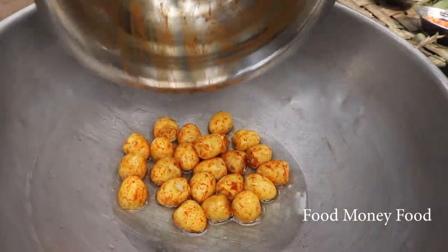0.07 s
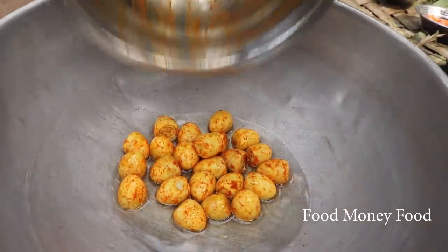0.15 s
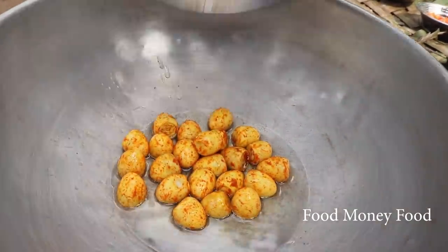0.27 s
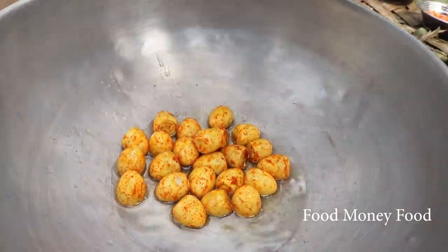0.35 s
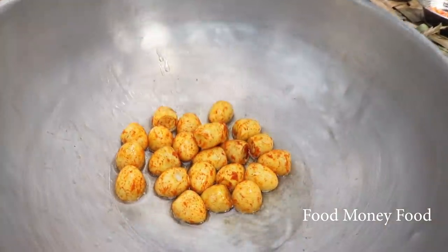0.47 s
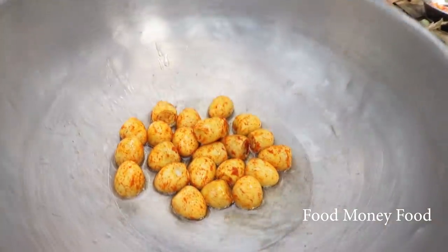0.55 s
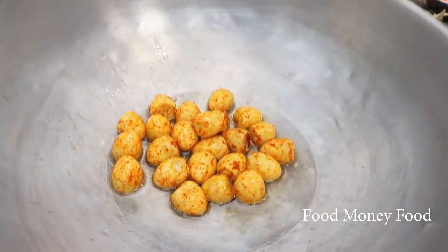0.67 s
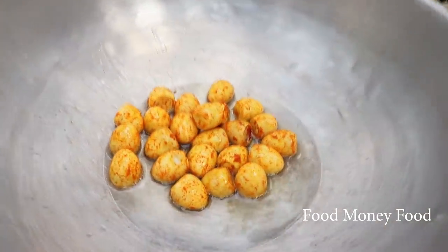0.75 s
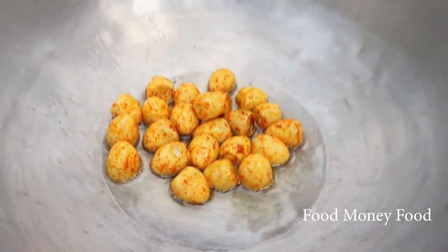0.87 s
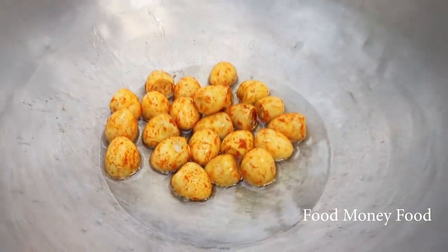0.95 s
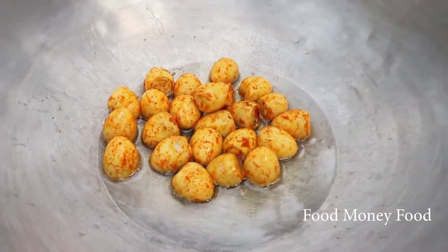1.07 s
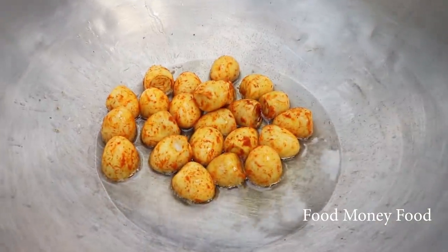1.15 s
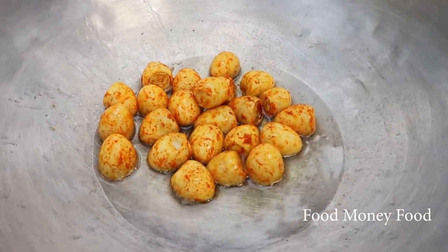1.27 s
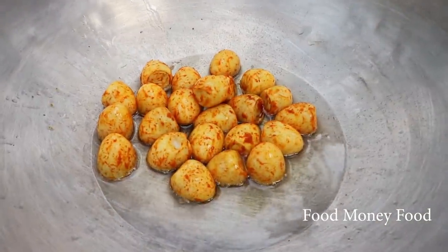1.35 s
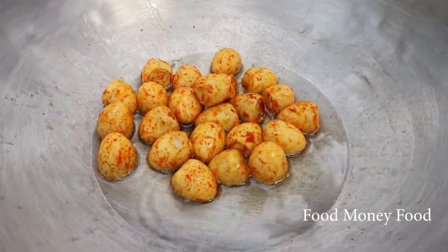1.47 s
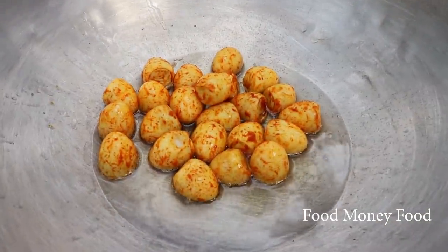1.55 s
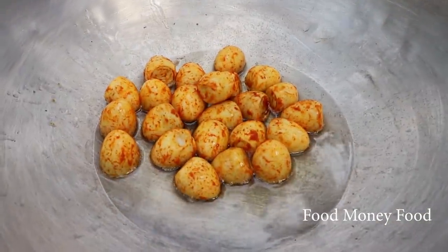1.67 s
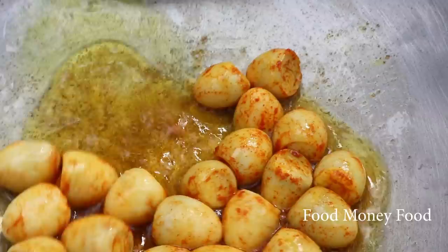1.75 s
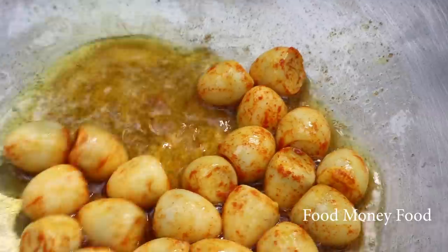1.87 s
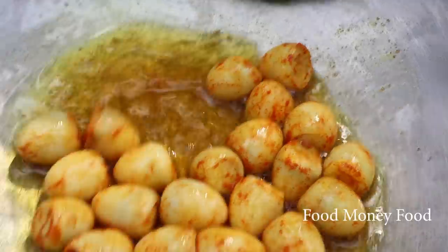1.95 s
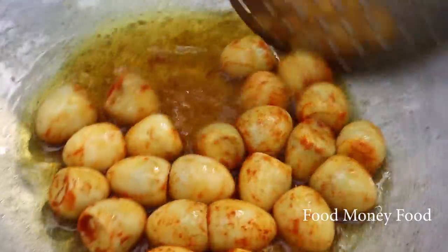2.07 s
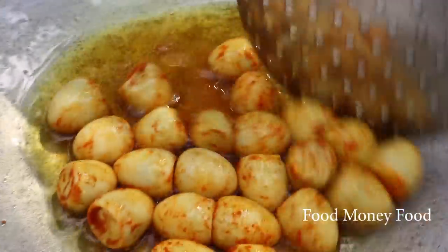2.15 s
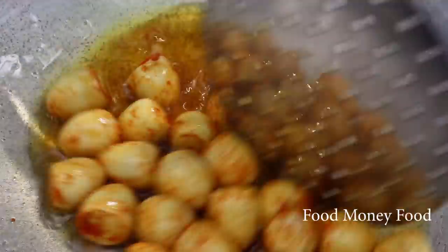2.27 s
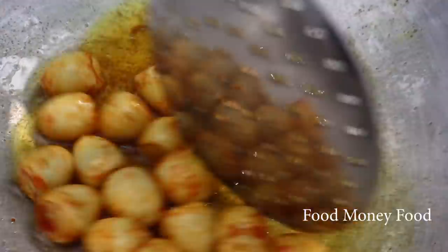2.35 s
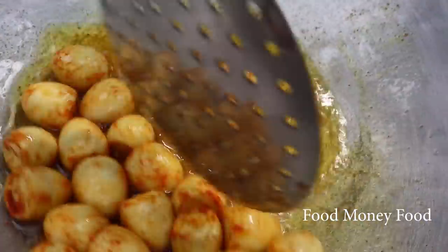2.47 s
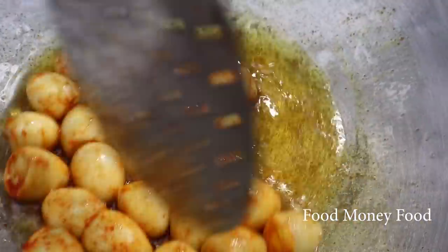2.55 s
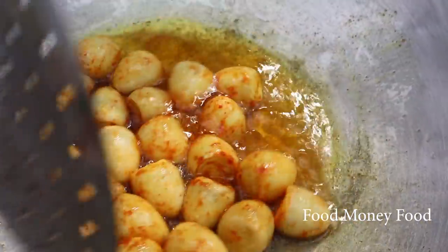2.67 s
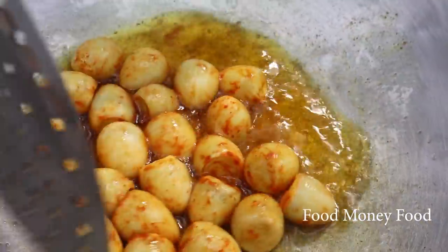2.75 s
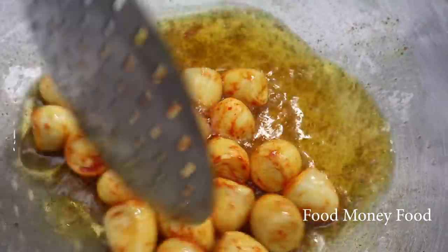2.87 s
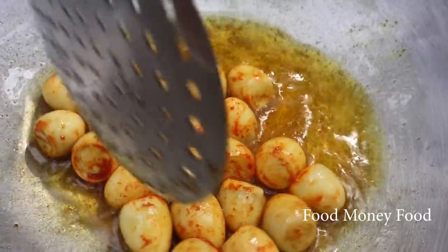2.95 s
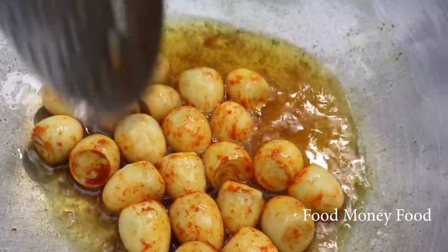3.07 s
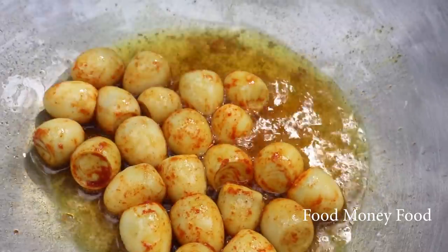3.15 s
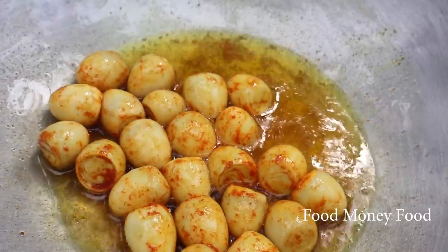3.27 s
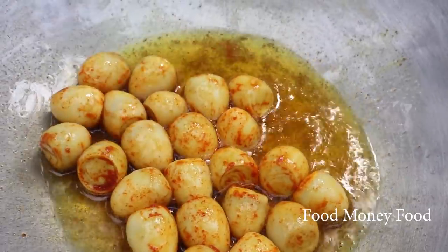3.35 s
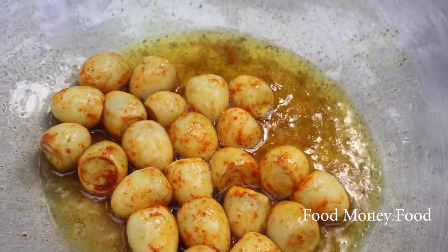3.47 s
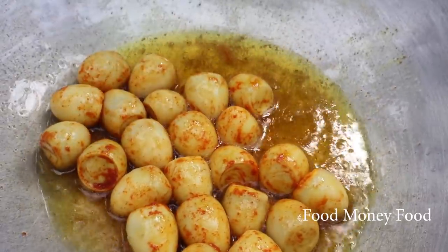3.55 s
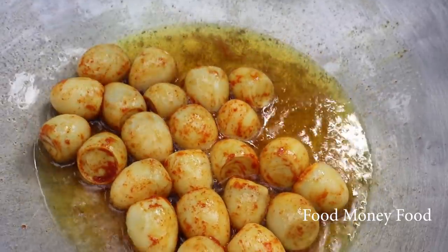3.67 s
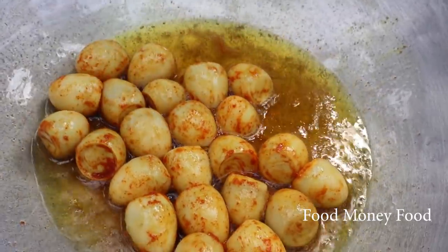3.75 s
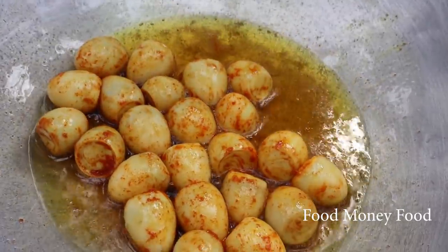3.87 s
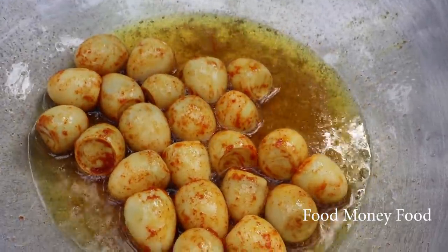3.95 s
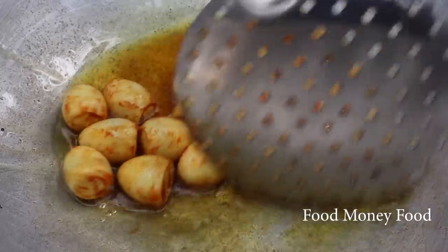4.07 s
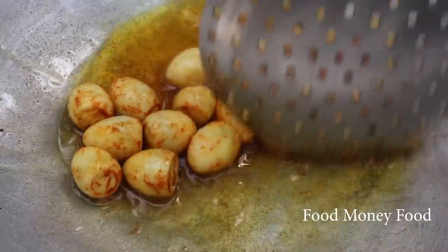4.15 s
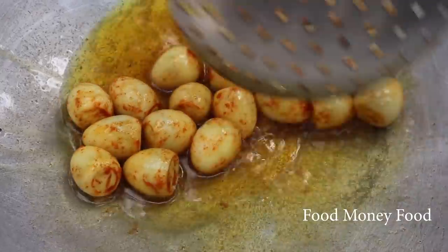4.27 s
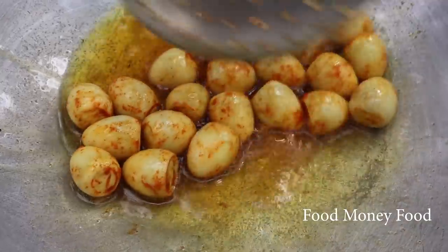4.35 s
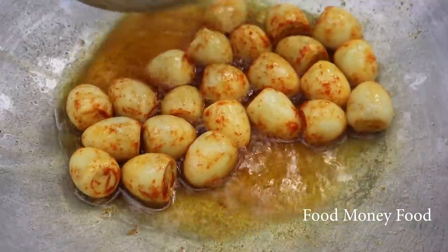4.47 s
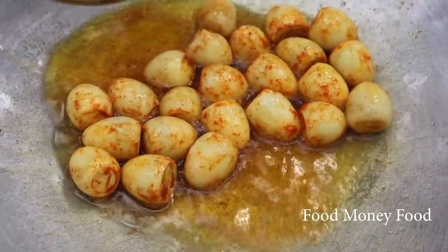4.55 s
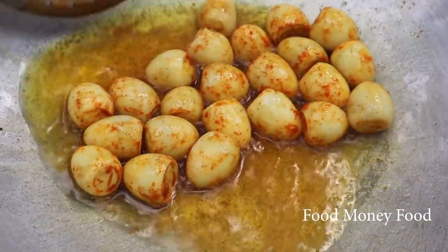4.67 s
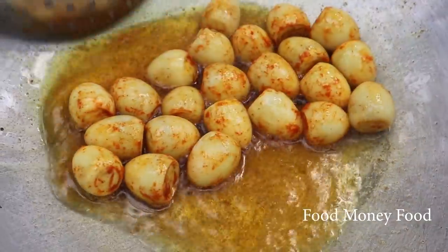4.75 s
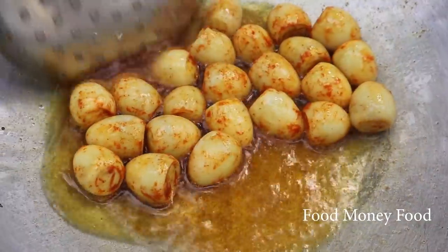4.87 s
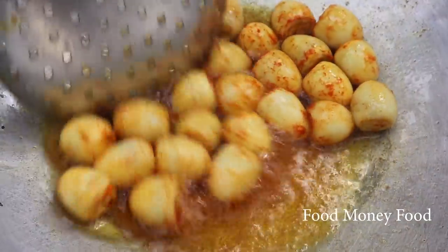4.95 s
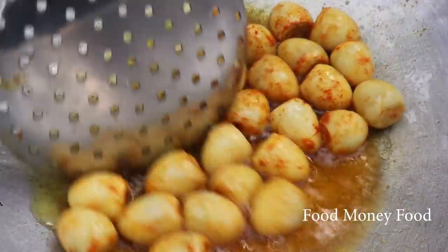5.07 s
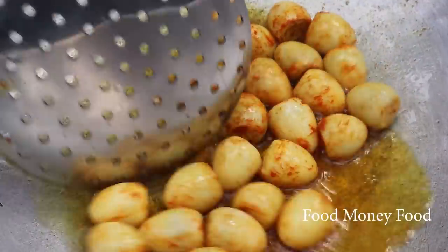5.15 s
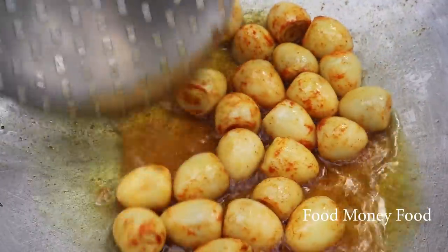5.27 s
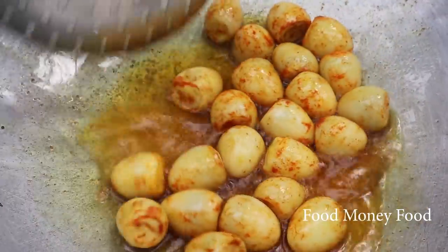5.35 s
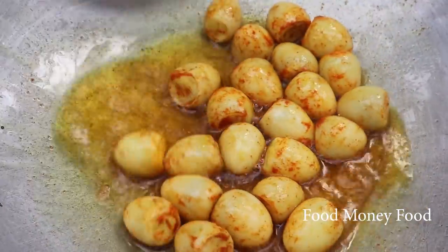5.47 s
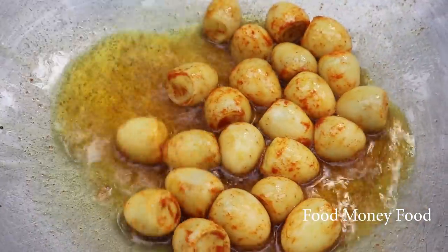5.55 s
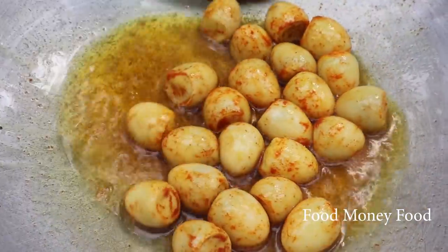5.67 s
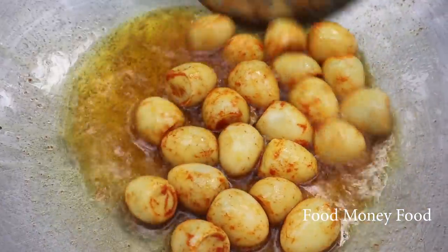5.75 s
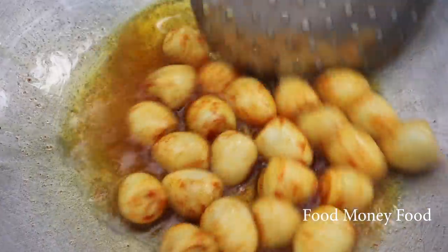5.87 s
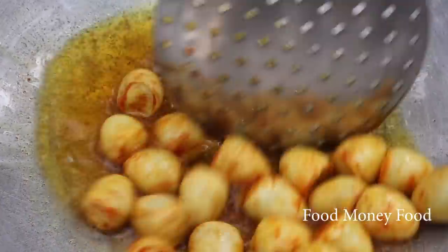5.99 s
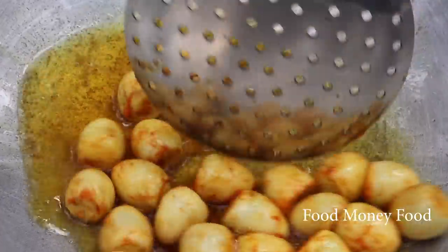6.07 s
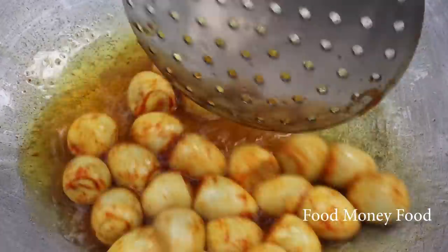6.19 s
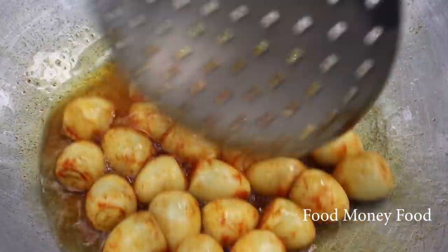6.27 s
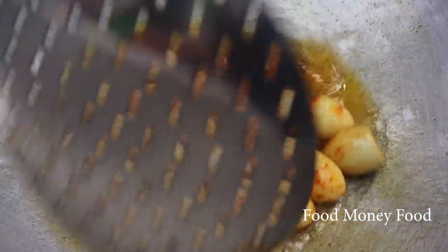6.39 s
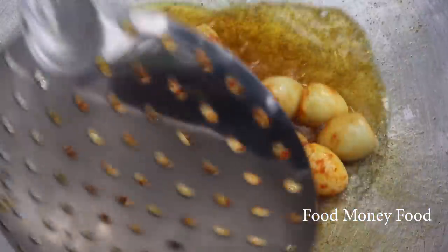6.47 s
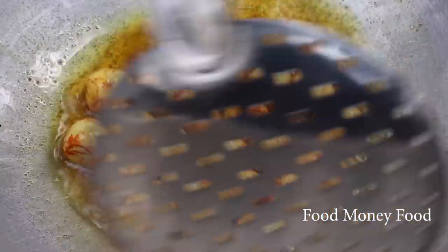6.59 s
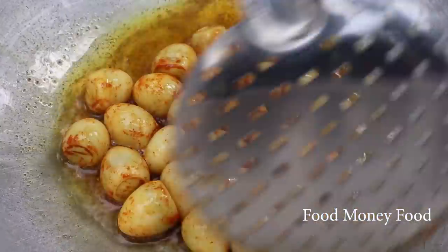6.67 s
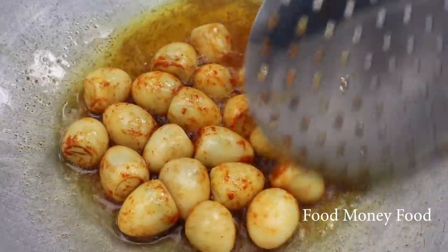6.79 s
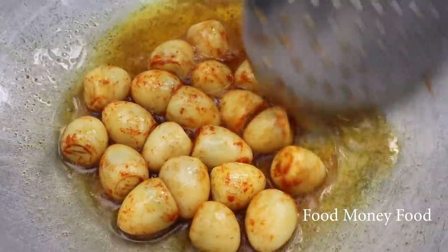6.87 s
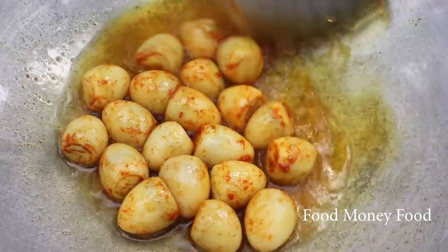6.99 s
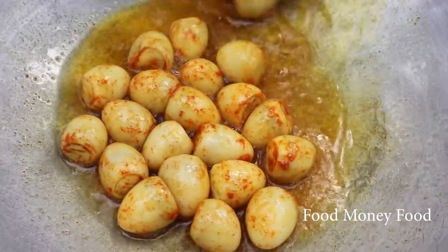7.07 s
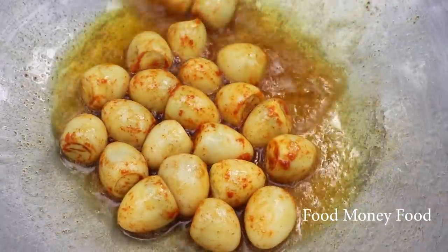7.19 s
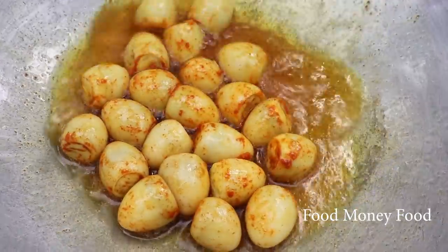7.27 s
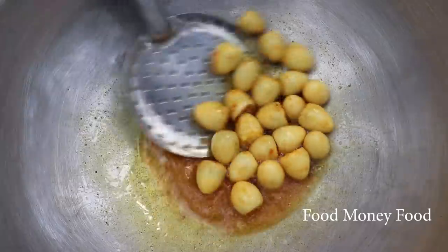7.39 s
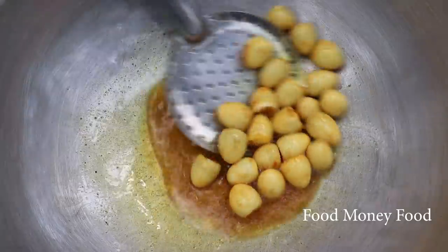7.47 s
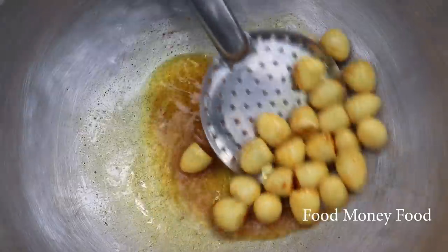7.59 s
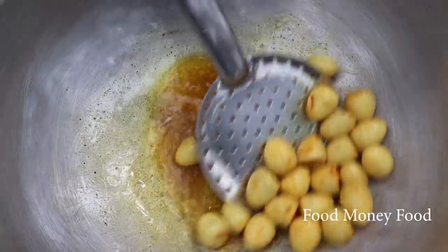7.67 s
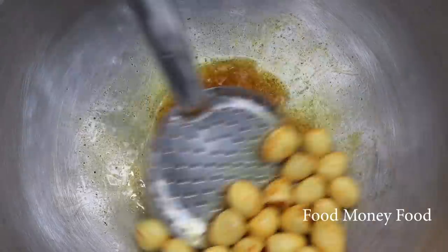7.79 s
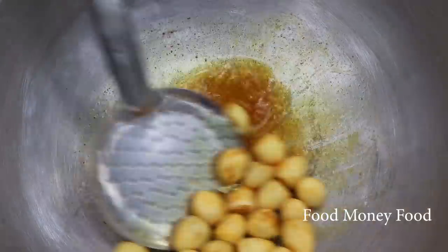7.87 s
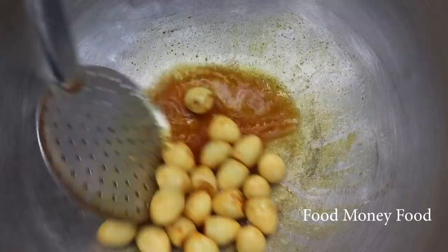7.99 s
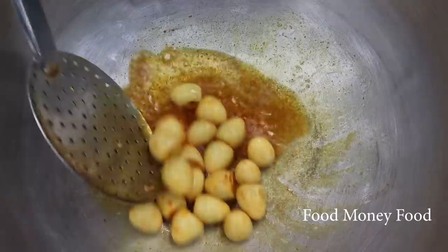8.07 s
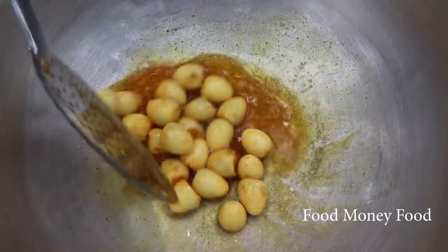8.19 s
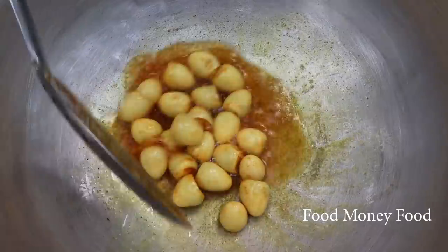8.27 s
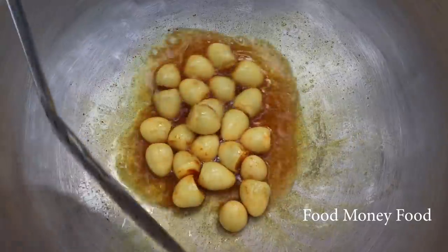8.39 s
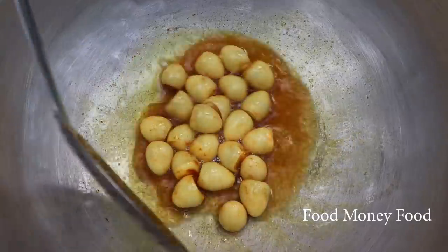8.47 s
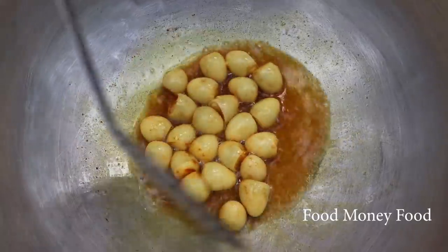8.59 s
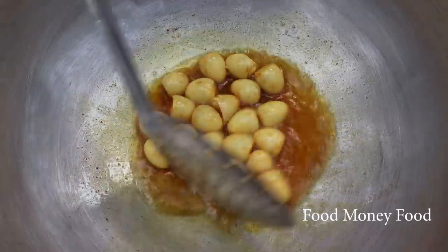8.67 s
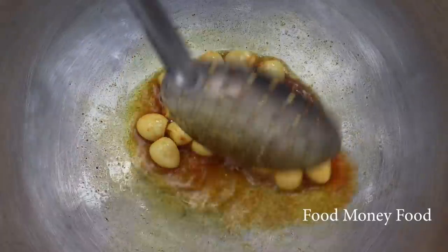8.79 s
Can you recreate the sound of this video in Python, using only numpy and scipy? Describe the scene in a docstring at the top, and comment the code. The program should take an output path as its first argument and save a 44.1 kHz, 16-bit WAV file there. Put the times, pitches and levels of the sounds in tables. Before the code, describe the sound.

A metal bowl hums briefly as it is drawn away from a wide pan where eggs fry with a dense, crackling sizzle. The frying then abruptly turns fuller and oilier, with a soft low thump, sharp bubble pops and loud clanks of a slotted ladle that ring and scrape along the pan. Outdoors, very close microphone, light low wind; the hardest knocks overload and briefly push the sizzle down.

```python
"""Small eggs fry in oil in a wide metal pan outdoors, close to a microphone in a light wind. At first the
frying, dense clicks and hiss, has one colour, while a bowl hums as filtered noise, low turbulence blows and
bubbles burst as short rings and puffs. From 1.76 s the frying turns within 20 ms to a deeper colour; a soft
thump, a dying sine, follows. Then a slotted ladle knocks the pan, ringing its modes, and scrapes along it as
slips drive resonances; knocks overload the input and gain control ducks the sizzle."""
import sys
import numpy as np
from scipy import signal
from scipy.io import wavfile
from scipy.ndimage import uniform_filter1d

SR = 44100
rng = np.random.default_rng(int(sys.argv[2]) if len(sys.argv) > 2 else 0)


def to_linear_factor(level_db):
    """Convert decibel levels (scalar or array-like) to linear amplitude factors."""
    exponent = np.asarray(level_db, float) / 20
    return 10 ** exponent


def master_out(mix):
    """Clip the mix to full scale and print it as 16-bit PCM to the path in sys.argv[1]."""
    frames = np.transpose(np.atleast_2d(mix))
    ceiling = np.clip(frames, -1, 1)
    pcm = np.round(ceiling * 32767).astype(np.int16)
    wavfile.write(sys.argv[1], SR, pcm)


N = 389403  # samples

# Colour of the frying from 1.76 s on. Each row: frequency in Hz, relative spectral level in dB per Hz.
LATER_FRYING = [(120, -11.5), (200, -16), (366, 3.5), (394, -1), (424, 1), (509, -10.5), (867, -14),
                (1370, -8.5), (1590, -4), (1740, -6.5), (2960, -6.5), (4200, 1), (4950, -12), (9930, -15.5),
                (13500, -29), (16000, -32)]
# Modes of the pan. Each row: frequency in Hz, relative level in dB, decay time t60 in seconds.
PAN = [(415, -1, 0.5), (419.5, -3, 0.45), (352, -10, 0.13), (292, -20, 0.057), (480, -13, 0.1),
       (560, -14, 0.1), (847, -35, 0.07)]


def evened(x):
    """Normalisation of power: scales to rms 1."""
    return x / np.sqrt(np.mean(x ** 2) + 1e-20)


def read(points, hz):
    """Interpolation of a spectrum on a logarithmic frequency axis."""
    f, value = np.transpose(points)
    return np.interp(np.log(hz + 1), np.log(f + 1), value)


def add(mix, s, sound):
    """Superposition: adds a sound to the mix at time s in seconds."""
    part = mix[round(s * SR):][:len(sound)]
    part += sound[:len(part)]


def coloured(x, points):
    """Minimum-phase filtering: the Hilbert transform of the log gain gives a causal response."""
    level_db = np.maximum(read(points, np.abs(np.fft.fftfreq(4096, 1 / SR))), -90)
    log_gain = np.log(to_linear_factor(level_db))
    taps = np.fft.ifft(np.exp(np.conj(signal.hilbert(log_gain)))).real[:2048]
    return signal.oaconvolve(x, taps)[:len(x)]


def ringing(modes, seconds):
    """Modal decay: a struck body sounds as a sum of exponentially dying sines."""
    t = np.arange(round(seconds * SR)) / SR
    return sum(to_linear_factor(db - 60 * t / t60) * np.sin(2 * np.pi * hz * t) for hz, db, t60 in modes)


def clicks(per_s, spread_db):
    """Random impulse process: independent clicks of either sign, a few much larger than the rest."""
    size = to_linear_factor(spread_db * np.minimum(rng.exponential(1, N), 5))
    occurs = rng.random(N) < per_s / SR
    return size * occurs * rng.choice([-1., 1.], N)


def wobble(size, seconds):
    """Slow random fluctuation: twice-smoothed noise, evened to rms 1 over the whole scene, then cut."""
    span = max(round(seconds * SR), 2)
    slow = uniform_filter1d(uniform_filter1d(rng.standard_normal(N), span), span)
    return evened(slow)[:size]


def resonate(x, hz, width):
    """Heterodyne resonance that can follow a pitch curve: shift to zero, smooth twice, shift back."""
    turn = np.exp(2j * np.pi * np.cumsum(hz * np.ones(len(x))) / SR)
    r = np.exp(-np.pi * width / SR)
    smooth = signal.lfilter([(1 - r) ** 2], [1, -2 * r, r * r], x / turn)
    return 2 * (turn * smooth).real


def clatter(x, top_hz=7500):
    """Broadband excitation of a body: dull wide noise takes on the colour of the later frying."""
    dull = signal.butter(2, top_hz, fs=SR, output="sos")
    return evened(signal.sosfilt(dull, coloured(x, LATER_FRYING)))


def burst(hz, t60, noise, tonal=.6, echo_s=0.0016):
    """Bubble collapse: the wall tears in a short rising ring and a puff of spray; the pan wall echoes."""
    t = np.arange(len(noise)) / SR
    ring = np.sin(2 * np.pi * hz * t * (1 + 12 * t)) * to_linear_factor(-60 * t / (0.22 * t60))
    # the echo repeats the ring alone
    ring += 0.78 * np.roll(ring, round(echo_s * SR)) * (t > echo_s)
    puff = evened(resonate(noise, hz, 0.76 * hz)) * to_linear_factor(-60 * t / t60)
    return (tonal * ring + 0.29 * puff) * (1 - np.exp(-t / 0.00015))


def ticks(tilt_db_per_octave=-4.5):
    """Impulsive radiation: tiny droplets of oil snap as very short, bright damped sines."""
    t, out = np.arange(200) / SR, np.zeros(N)
    for hz in np.geomspace(5500, 14000, 8):
        snap = np.sin(2 * np.pi * hz * t) * np.exp(-t / 0.00022) * (1 - np.exp(-t / .0001))
        band = signal.oaconvolve(clicks(per_s=120, spread_db=5.0), snap)[:N]
        out += to_linear_factor(tilt_db_per_octave * np.log2(hz / 8000)) * band
    return evened(out)


def sizzle(hiss_db=-4, crackle_db=-3):
    """Source and filter: countless small bubbles over a fine hiss, coloured by the bowl of the pan."""
    # Frying level and treble over time, before gain control.
    # Each row: time in seconds, frying level in dB, lift of the treble in dB before its flicker.
    activity = [(0.0, -22.5, 1.5), (.39, -24, -6.5), (1.742, -24, -11), (1.8, -25, 0.5), (2.3, -25.5, -0.5),
                (2.45, -21, 1), (2.55, -27, 2.5), (3.1, -26.5, -0.5), (3.4, -28.5, -4.5), (4.05, -28.5, -1),
                (4.17, -19, -4.5), (4.3, -19, 12), (4.4, -23.5, 4.5), (4.89, -26, 8.5), (5.15, -14.5, 5),
                (5.35, -18.5, -5.5), (5.63, -29, 8.5), (5.9, -21.5, 7.5), (6.1, -13, 1.5), (6.4, -25.5, 8),
                (6.62, -26, 6.5), (7.06, -18, 6), (7.35, -26, -3), (7.77, -25, 4), (7.86, -25, 5),
                (8.1, -27, 5.5), (8.73, -31, 6.5), (8.83, -38, 13)]
    # Colour of the frying before 1.76 s. Each row: frequency in Hz, relative spectral level in dB per Hz.
    early_frying = [(120, -67), (200, -32), (289, -13), (328, 0), (612, -16), (735, -6.5), (1140, -18),
                    (1480, -6.5), (1980, -5), (2470, -13), (3020, -6), (3970, 1.5), (4950, -8.5), (6880, -14),
                    (16000, -32.5)]
    change_s, turn_s = 1.76, 0.02  # start and length of the turn to the later colour
    early_ticks_db, later_ticks_db = -15, -11  # droplets against the frying, before lift
    flicker_db, flicker_s = 2, 0.028  # rms and smoothing time of the random treble flicker
    t = np.arange(N) / SR
    s, level_db, treble_db = np.transpose(activity)
    crackle = np.zeros(N)
    for hz in np.geomspace(500, 14000, 24):
        grain = burst(hz, 0.017 + 22 / hz, rng.standard_normal(1500), tonal=0.39)
        grain = grain / np.linalg.norm(grain) * (hz / 4000) ** .5
        crackle += signal.oaconvolve(clicks(per_s=40, spread_db=3.5), grain)[:N]
    drive = to_linear_factor(hiss_db) * rng.standard_normal(N) + to_linear_factor(crackle_db) * evened(crackle)
    later = np.clip((t - change_s) / turn_s, 0, 1)
    frying = (1 - later) * evened(coloured(drive, early_frying))
    frying += later * evened(coloured(drive, LATER_FRYING))
    treble = signal.sosfiltfilt(signal.butter(1, 8000, "high", fs=SR, output="sos"), frying)
    # the treble of the frying rises and falls along the curve, with random flicker
    lift = to_linear_factor(np.interp(t, s, treble_db) + flicker_db * wobble(N, flicker_s))
    droplets = to_linear_factor(np.where(later < .5, early_ticks_db, later_ticks_db)) * ticks()
    return to_linear_factor(np.interp(t, s, level_db)) * (frying + (lift - 1) * treble + lift * droplets)


def bowl():
    """Friction-driven resonance: the emptied bowl is drawn away over the rim and hums in its own modes."""
    # Each row: frequency in Hz, resonance width in Hz, relative level at a 100 Hz width in dB.
    modes = [(336, 110, 0), (754, 72, -1), (1320, 350, 9), (1760, 86, -18), (2320, 88, -6)]
    # Strength of the rub. Each row: time in seconds, level in dB.
    rub_level = [(0.0, -26.5), (0.048, -37), (0.086, -28), (0.104, -37), (0.112, -35), (0.262, -30),
                 (0.34, -52)]
    s, db = np.transpose(rub_level)
    t = np.arange(s[0], s[-1], 1 / SR)
    rub = rng.standard_normal(len(t))
    hum = np.zeros(len(t))
    for hz, width, mode_db in modes:
        # a narrower resonance builds up more strongly
        hum += to_linear_factor(mode_db) * np.sqrt(100 / width) * evened(resonate(rub, hz, width))
    fade = np.clip((s[-1] - t) / .04, 0, 1)
    return np.pad(to_linear_factor(np.interp(t, s, db)) * evened(hum) * fade, (0, N - len(t)))


def wind(lumps_db=1.0):
    """Turbulent pressure fluctuation: lumpy low noise arises at the microphone port."""
    # Each row: time in seconds, level in dB.
    strength = [(0.0, -39), (.66, -35.5), (1.0, -36), (1.75, -37.5), (1.9, -25.5), (2.15, -29),
                (2.38, -26.5), (2.75, -32.5), (2.95, -27.5), (3.5, -27.5), (4.1, -29.5), (4.5, -35.5),
                (5.06, -26), (5.18, -17.5), (5.68, -26), (5.75, -14), (5.899, -19.5), (6.55, -30.5),
                (6.68, -16.5), (6.85, -25), (7.06, -11.5), (7.38, -26.5), (7.43, -33), (8.68, -31.5),
                (8.8, -35)]
    # Turbulence spectrum. Each row: frequency in Hz, relative spectral level in dB per Hz.
    turbulence = [(8.8, 4), (15, -5.5), (75, -3.5), (233, -12.5), (300, -15.5), (390, -19), (660, -120)]
    gust = coloured(rng.standard_normal(N), turbulence)
    gust = evened(gust * to_linear_factor(lumps_db * wobble(N, 0.031)))
    return to_linear_factor(np.interp(np.arange(N) / SR, *np.transpose(strength))) * gust


def pops(count=30):
    """Steam bubble collapse: each burst has its own pitch, thump on the pan and spray."""
    # Loud bubbles. Each row: start in seconds, overall gain in dB, starting pitch in Hz,
    # relative gain of the low thump in dB, relative gain of the fine spray in dB.
    loud = [(.061, -14.5, 1780, -17, -25), (.178, -22, 3900, -10, -22), (.394, -9, 3120, -15, -28),
            (.494, -16.5, 3700, -5, -31), (.6818, -10.5, 3970, -16, -25), (.7765, -12.5, 1980, -8.5, -13),
            (.7775, -6.5, 3100, -25, -20), (.8042, -11, 3840, -24, -26), (1.181, -5.5, 3500, -8.5, -29),
            (1.3193, -15, 3970, 0, -26), (1.464, -9.5, 4100, -23, -24), (1.513, -6.5, 3450, -4, -34),
            (1.5968, -11, 4110, -2.5, -26), (1.8485, 0, 4300, -32, -32), (1.8892, -5, 4340, -30, -21),
            (2.452, -8, 4530, -29, -26), (2.7146, -3, 4100, -27, -20), (2.856, -8, 3930, -21, -17),
            (2.8898, -11, 3980, -24, -21), (2.9195, -7, 3930, -26, -5), (3.039, -16.5, 2830, -25, -26.5),
            (3.3169, -5, 3860, -24, -29), (3.4124, -9.5, 4000, -23, -4.5), (3.444, -12, 4170, -16, -21),
            (3.5587, -9, 4200, -20, -15), (3.606, -6, 4060, -25, -28), (3.712, -7, 4260, -25, -24),
            (3.755, -8, 1340, -25, -18), (3.8412, -10.5, 4100, -19, -10), (3.928, -10.5, 3900, -10.5, -3),
            (4.067, -7.5, 4530, -31, -30), (4.2045, 2.5, 3500, -37, -20), (4.32, -8, 1770, -30, -20),
            (4.4347, -3.5, 7230, -35, -18), (4.7601, -7, 4270, -33, -15), (4.804, -6.5, 5000, -26, -14),
            (4.84, -6.5, 4430, -11, -18), (5.1707, 5, 4130, -33, -8), (5.236, 1.5, 3160, -18, -19),
            (5.259, -18, 4290, -14, 21), (5.3047, 3, 4120, -33, -3), (5.355, -2.5, 3970, -11, -21),
            (5.3931, -13, 3550, -17, -17), (5.4156, -6, 4000, -27, -1), (5.5318, -5.5, 4100, -30, -12),
            (5.606, -6, 4350, -14.5, -12), (6.5818, -6, 3900, -23, -17), (6.722, 1.5, 4180, -15, -21),
            (6.7346, 2.5, 3940, -15, -9), (7.0484, -3, 4180, -5.5, -14), (7.0838, -5.5, 3740, 2.5, -5),
            (7.2657, -10, 5140, -11, -14), (7.2978, -12.5, 4180, -24, 7), (7.3657, -15.5, 4100, -7, 5),
            (7.5214, -6.5, 3900, -20, -19), (7.6282, -3.5, 3740, -26, -11), (7.712, -6, 4000, -23, -14),
            (7.725, -1, 4100, -20, -14), (7.789, -2, 3880, -14, -1), (7.8316, -8, 6400, -35, 4),
            (7.9655, -3, 4300, -29, -24), (8.0594, -3.5, 4220, -38, -20), (8.6478, -6, 6500, -26, -8)]
    # Lesser bubbles at random. Each row: mean, spread; the rows are overall gain in dB, pitch in Hz,
    # relative thump gain in dB and relative spray gain in dB.
    lesser_range = [(-19, 2.5), (4100, 300), (-22, 4), (-15, 5)]
    t60 = 0.032  # s, decay of the puff at the bubble's pitch
    mean, spread = np.transpose(lesser_range)
    starts = rng.uniform(0, N / SR, count)
    lesser = np.c_[starts, mean + spread * rng.standard_normal((count, 4))]
    rows = np.r_[loud, lesser]
    out, noise = np.zeros(N), rng.standard_normal((len(rows), 3, 3000))
    for (s, db, hz, thump_db, spray_db), (a, b, c) in zip(rows, noise):
        pop = burst(hz, t60, a, tonal=0.83)
        thump = burst(744, t60, b, tonal=0.98) + 1.16 * burst(1660, 2.3 * t60, b[::-1], tonal=0.49)
        spray = burst(8100, 0.79 * t60, c, tonal=0.28)
        add(out, s, to_linear_factor(db) * (pop + to_linear_factor(thump_db) * thump + to_linear_factor(spray_db) * spray))
    return out


def bump():
    """Damped oscillation: one soft low thump at the microphone is a dying sine."""
    # One row: start in seconds, level in dB, frequency in Hz, decay time t60 in seconds.
    thump = (1.844, -6, 66, .13)
    out, (s, db, hz, t60) = np.zeros(N), thump
    sound = ringing([(hz, db, t60)], .3)
    add(out, s, sound * (1 - np.exp(-np.arange(len(sound)) / SR / .003)))
    return out


def knocks():
    """Impact excitation: a brief thud and crack, long modal rings of pan and ladle, a dying rattle."""
    # Each row: start in seconds, strength in dB, pitch of the dull thud in Hz,
    # then against the strength: crack in dB, pan ring in dB, ladle ring in dB.
    strikes = [(1.937, 21.5, 447, -0.5, -12.5, -29), (2.068, 10, 476, -5.5, -22, -60),
               (4.111, 7, 425, -10.5, -27, -60), (4.124, -6.5, 390, -12, -2, -58),
               (4.904, 10.5, 357, -2.5, -14.5, -38), (5.016, 18.5, 433, -5.5, -28, -50),
               (5.693, 22.5, 378, 8.5, -17.5, -36), (5.74, 5, 440, 7, -10, -60),
               (6.608, 13.5, 412, -8.5, -17.5, -35.5), (6.774, 27.5, 397, -10, -22, -44),
               (6.785, 16, 390, -16, -13.5, -58), (8.751, 3.5, 405, -6, -9, -62)]
    # Each row: frequency in Hz, relative level in dB before the crack's tilt, decay time t60 in seconds.
    ladle_modes = [(760, -6, .65), (1590, -9, .2), (2207, -3, 1.0), (2995, 0, .6), (5350, -22, .3)]
    shiver_db, shiver_t60_s = -19.5, 1  # rattle of pan and eggs, against the pan ring
    brightening = 0.52  # a harder crack tilts the ladle ring upward: dB per octave for each dB of crack
    out, noise = np.zeros(N), rng.standard_normal((len(strikes), SR // 2))
    t = np.arange(1500) / SR
    pan = ringing(PAN, 1)
    shiver = to_linear_factor(shiver_db - 60 * np.arange(SR // 2) / SR / shiver_t60_s)
    for (s, db, hz, crack_db, pan_db, ring_db), row in zip(strikes, noise):
        thud = np.sin(2 * np.pi * hz * t) * np.exp(-(t / 0.0065) ** 4)
        crack = evened(resonate(row[:1500], 570, 1020)) + 0.018 * row[:1500]
        crack = crack * to_linear_factor(crack_db) * np.exp(-(t / 0.006) ** 4)
        add(out, s, to_linear_factor(db) * (thud + crack) * (1 - np.exp(-t / 0.0013)))
        tilt = brightening * crack_db
        ladle = ringing([(f, d + tilt * np.log2(f / 2200), t60) for f, d, t60 in ladle_modes], 1)
        add(out, s, to_linear_factor(db) * (to_linear_factor(pan_db) * pan + to_linear_factor(ring_db) * ladle))
        add(out, s, to_linear_factor(db + pan_db) * shiver * clatter(row))
    return out


def scrapes():
    """Stick-slip friction: dense uneven slips drive the damped pan and the ladle's edge."""
    # Pressure of the ladle, one list for each stretch of scraping.
    # Each row: time in seconds, pressure in dB.
    stretches = [
        [(2.02, -4.5), (2.1, -6), (2.28, -15), (2.33, -27.5), (2.36, -32)],
        [(2.385, -35), (2.397, -22.5), (2.43, -41)],
        [(5.03, -2), (5.095, -19), (5.112, -14.5), (5.15, -25)],
        [(5.175, -27), (5.187, -15.5), (5.225, -31)],
        [(5.75, 6), (5.8, -0.5), (5.92, -5.5), (5.95, -6.5), (6.04, -11.5), (6.06, -18), (6.11, -34)],
        [(6.62, -3), (6.65, -17)],
        [(6.79, -10), (6.856, -9.5), (6.896, -2.5), (6.936, -4), (7.006, -10.5), (7.06, -20), (7.08, -31)],
        [(7.37, -36), (7.42, -15), (7.44, -17.5), (7.51, -32)],
        [(7.515, -19.5), (7.547, -23), (7.573, -41), (7.601, -24.5), (7.645, -34)],
        [(7.65, -36), (7.666, -30.5), (7.72, -26), (7.762, -29.5), (7.85, -44)],
        [(7.91, -46), (7.932, -30.5), (7.96, -59)],
        [(7.98, -27.5), (8.05, -51)],
    ]
    # How the edge meets the pan, one row for each stretch. Each row: rumble pitch in Hz,
    # then against the pressure: grind in dB, rasp in dB, squeal in dB, hiss in dB.
    contact = [(416, -4, -20.5, -25, -4.5), (358, -13, -10, -13, -20), (398, -10, -19, -9, -8),
               (390, -27, -27, -8, -3), (396, -2.5, -27, -13.5, -5), (408, -20, -32, -35, -35),
               (389, -9, -37, -7, -10), (425, -34, -17, -28, -28), (390, -32, -10.5, -13, -25),
               (383, -2, 6.5, -9, 6), (430, -6, 8, -7, 10), (440, -16, -8, 3, 5)]
    # First row: rumble width in Hz, rumble level against the pressure in dB.
    # Each further row, for grind, rasp and squeal: frequency in Hz, width in Hz.
    bands = [(130, 5.9), (630, 430), (1350, 190), (3650, 390)]
    # pitches waver by this rms fraction and edge bands by stutter_db rms, as the ladle catches
    wander, wander_s, stutter_db = 0.047, 0.021, 1.5
    lift_ring_db = -21  # pan ring driven by the slips, against the pressure
    out = np.zeros(N)
    (rumble_width, rumble_db), *edge = bands
    for rows, (hz, *edge_db, hiss_db) in zip(stretches, contact):
        s, db = np.transpose(rows)
        t = np.arange(s[0], s[-1], 1 / SR)
        slips = clicks(per_s=2000, spread_db=2.0)[:len(t)] * signal.windows.tukey(len(t), .08)
        rumble_hz = hz * (1 + wander * wobble(len(t), wander_s))
        scrape = to_linear_factor(rumble_db) * evened(resonate(slips, rumble_hz, rumble_width))
        for (f, width), rel_db in zip(edge, edge_db):
            stutter = to_linear_factor(rel_db + stutter_db * wobble(len(t), wander_s))
            edge_hz = f * (1 + wander * wobble(len(t), 2 * wander_s))
            scrape += stutter * evened(resonate(slips, edge_hz, width))
        scrape += to_linear_factor(hiss_db) * clatter(rng.standard_normal(len(t)) + 0.88 * evened(slips))
        pressure = to_linear_factor(np.interp(t, s, db))
        add(out, s[0], pressure * scrape)
        # the free part of the pan keeps ringing after the ladle lifts
        ring = ringing(PAN[:1], .4)
        ring = ring / np.linalg.norm(ring)
        add(out, s[0], to_linear_factor(lift_ring_db) * signal.oaconvolve(pressure * evened(slips), ring))
    # the pan radiates little below its lowest modes
    return signal.sosfilt(signal.butter(5, 255, "high", fs=SR, output="sos"), out)


def scene():
    """Superposition of pressures: one microphone hears everything."""
    return (sizzle() + bowl() + wind() + pops() + bump() + knocks() + scrapes())[None]


def band_limit(x):
    """A steep low-pass at the top of the band."""
    return signal.sosfilt(signal.butter(12, 16200, fs=SR, output="sos"), x)


def record(dry, threshold_db=-15, detector_fall_db_per_s=70):
    """Dynamic compression: gain control reacts a few ms late, recovers slowly; what it misses clips."""
    # origin=99 makes the power average look back in time
    power_db = 10 * np.log10(np.abs(uniform_filter1d(dry[0] ** 2, 200, origin=99)) + 1e-12)
    fall = np.arange(N) / SR * detector_fall_db_per_s
    held_db = np.maximum.accumulate(power_db + fall) - fall
    over_db = np.maximum(held_db - threshold_db, 0)
    late = np.exp(-1 / (.007 * SR))  # 7 ms lag
    # each dB over the threshold takes 0.54 dB of gain away
    ducked = dry / to_linear_factor(0.54 * signal.lfilter([1 - late], [1, -late], over_db))
    low_pass = signal.firwin(255, 16100, fs=SR)[None]
    mix = signal.oaconvolve(np.clip(ducked, -1.02, 1.02), low_pass, "same")
    return band_limit(mix)


dry = scene()
out = record(dry)
master_out(out)
```